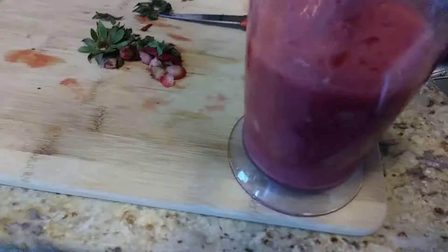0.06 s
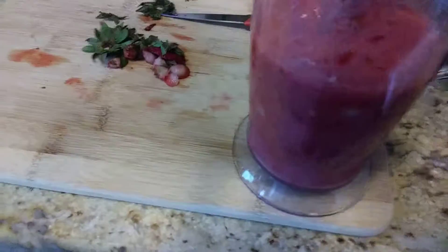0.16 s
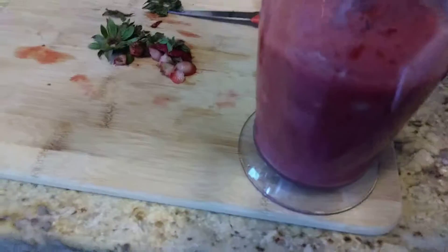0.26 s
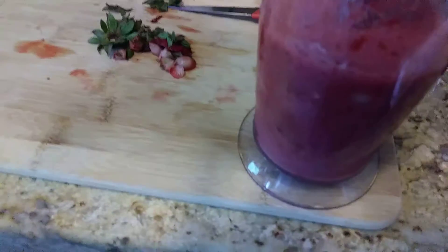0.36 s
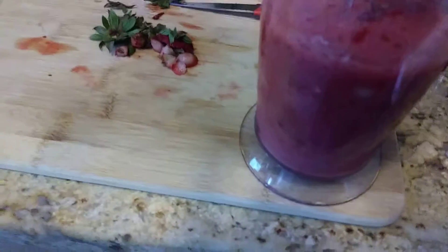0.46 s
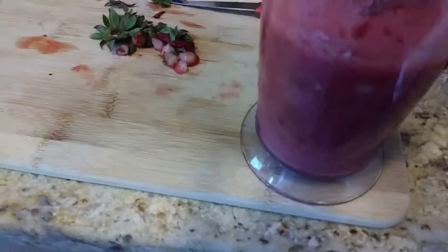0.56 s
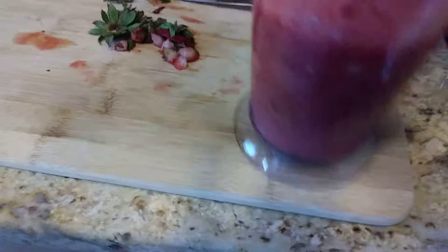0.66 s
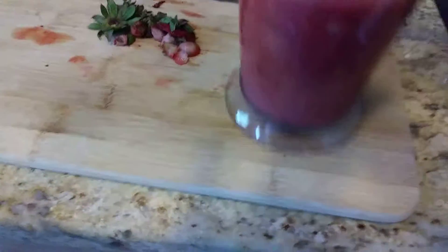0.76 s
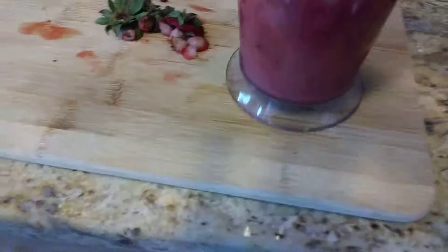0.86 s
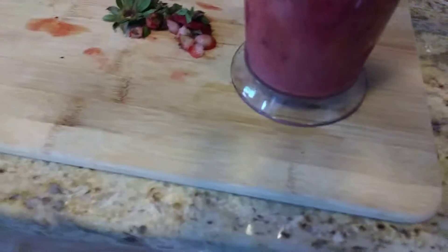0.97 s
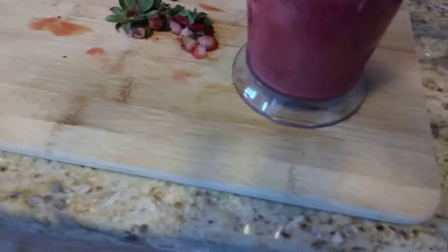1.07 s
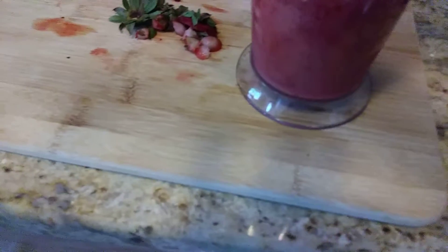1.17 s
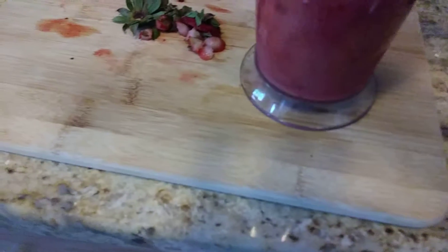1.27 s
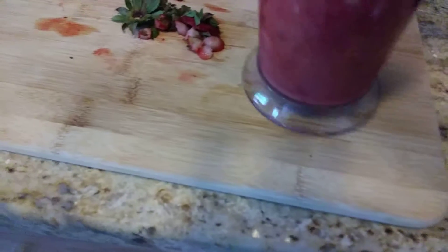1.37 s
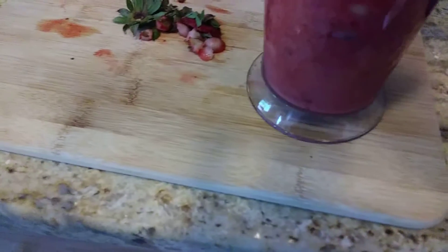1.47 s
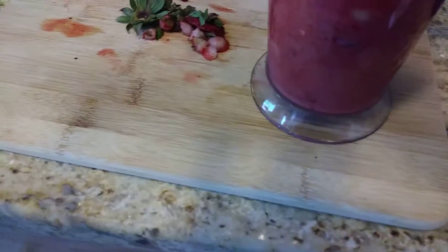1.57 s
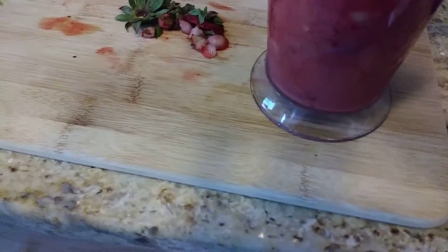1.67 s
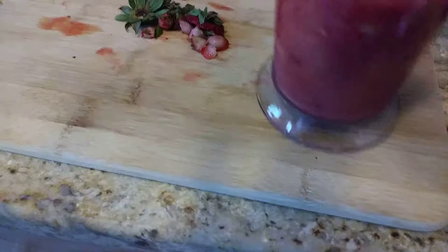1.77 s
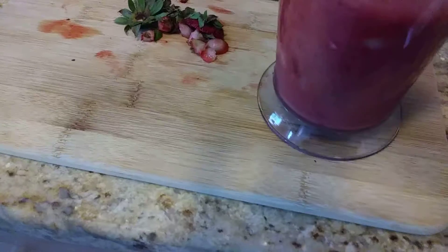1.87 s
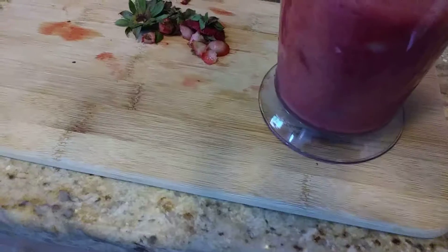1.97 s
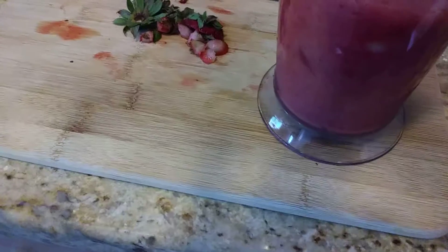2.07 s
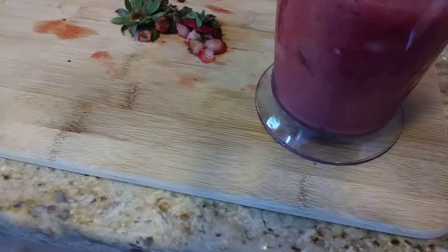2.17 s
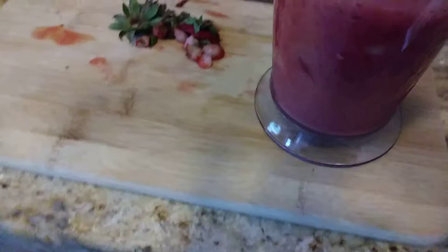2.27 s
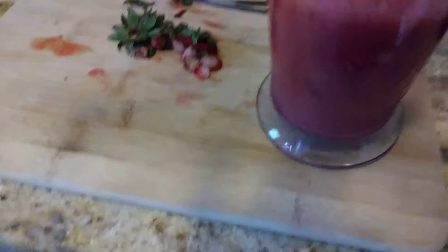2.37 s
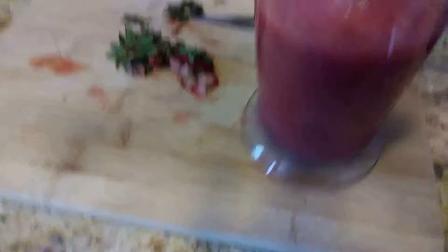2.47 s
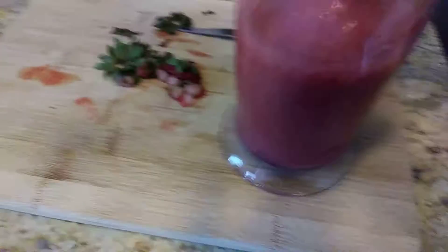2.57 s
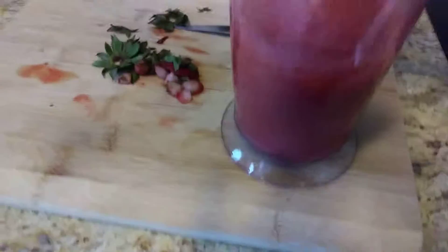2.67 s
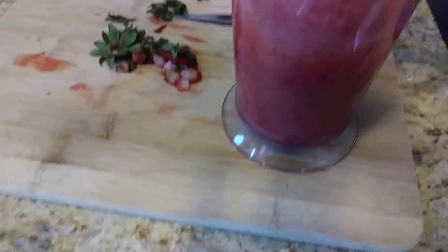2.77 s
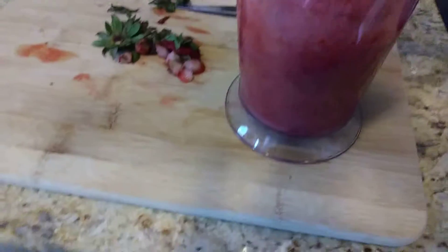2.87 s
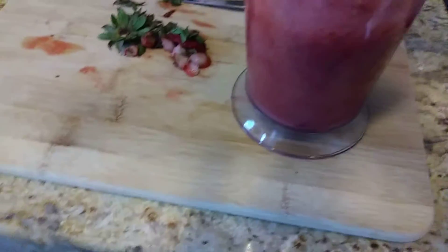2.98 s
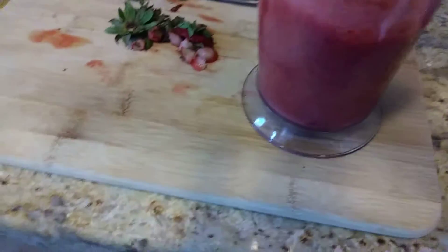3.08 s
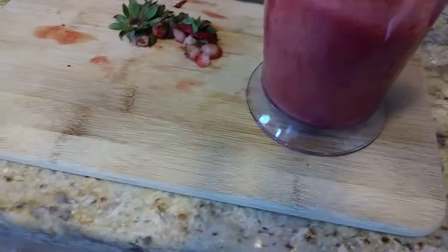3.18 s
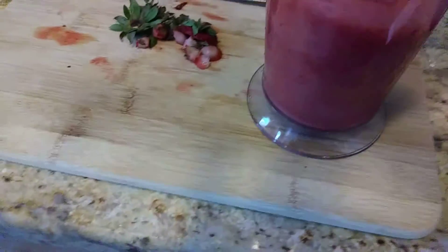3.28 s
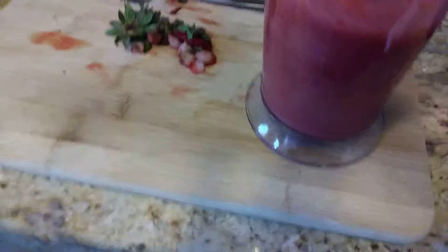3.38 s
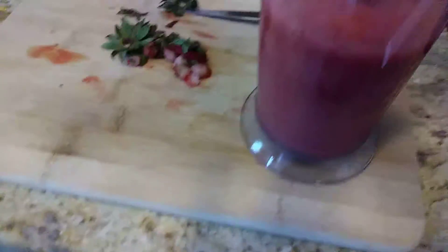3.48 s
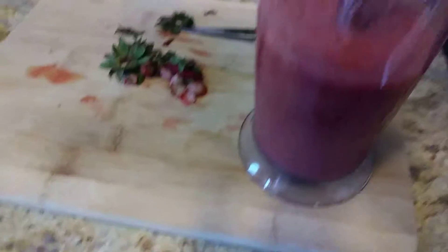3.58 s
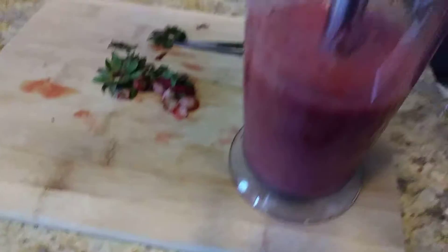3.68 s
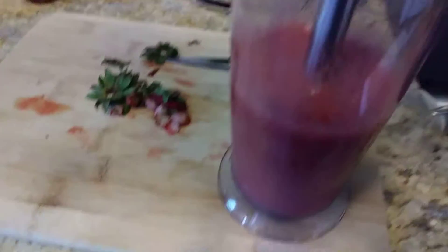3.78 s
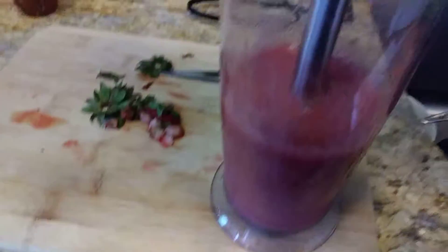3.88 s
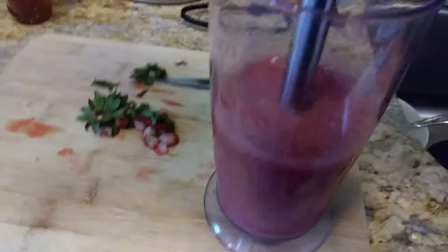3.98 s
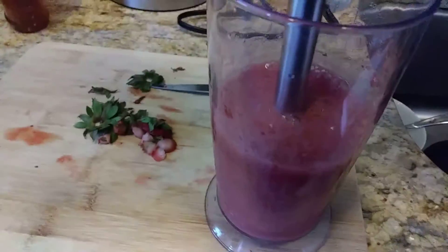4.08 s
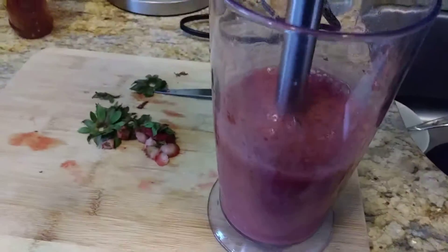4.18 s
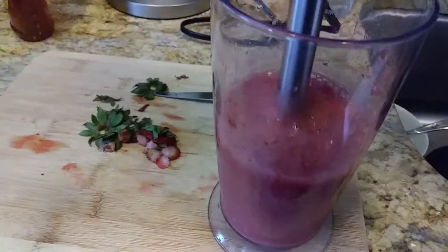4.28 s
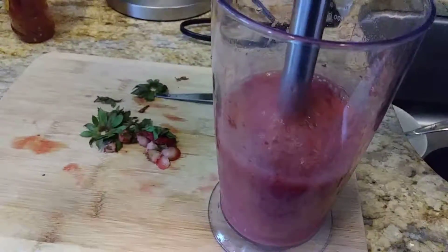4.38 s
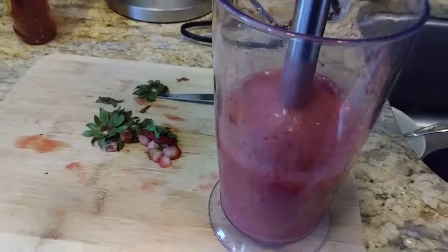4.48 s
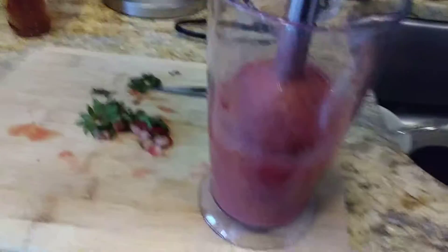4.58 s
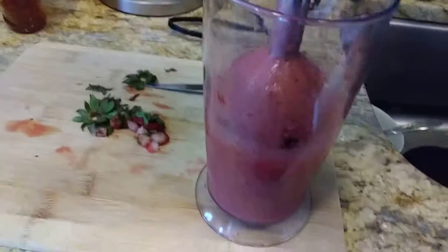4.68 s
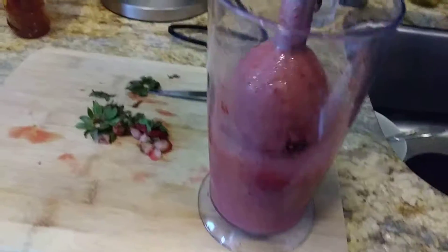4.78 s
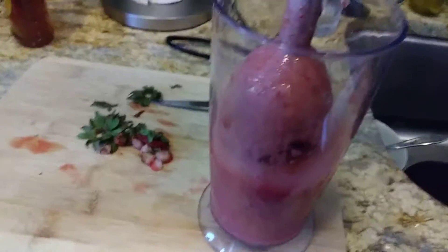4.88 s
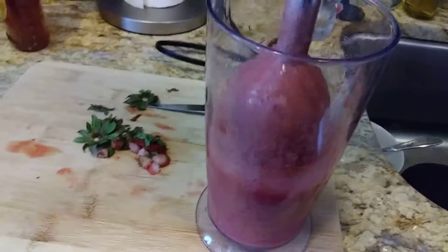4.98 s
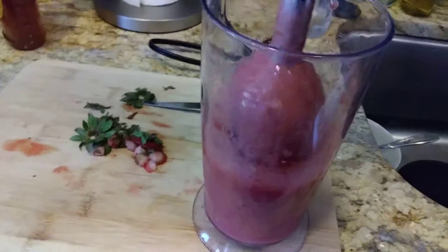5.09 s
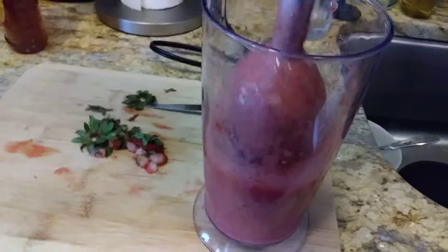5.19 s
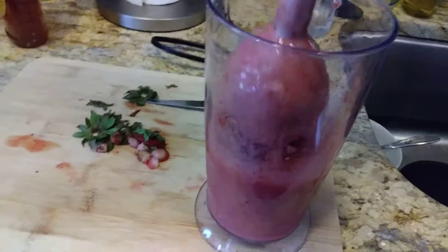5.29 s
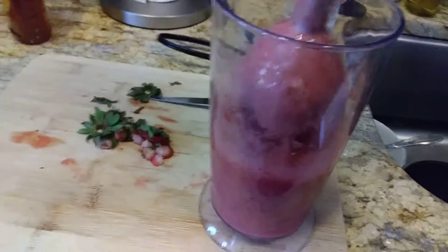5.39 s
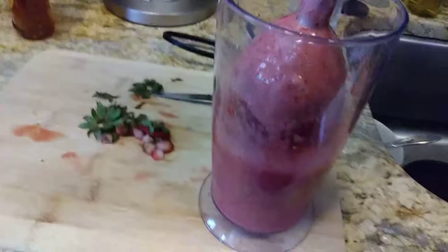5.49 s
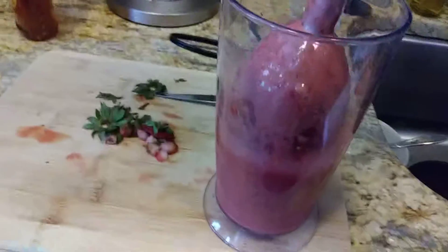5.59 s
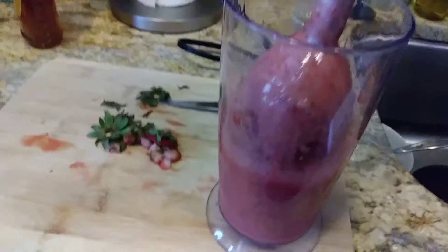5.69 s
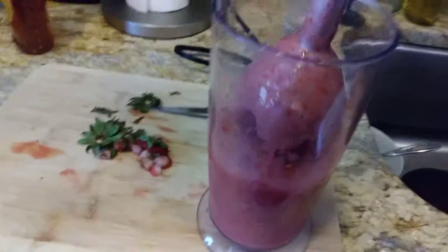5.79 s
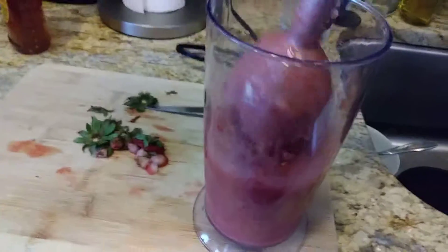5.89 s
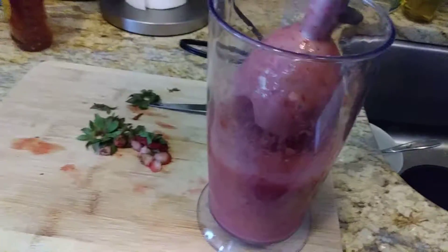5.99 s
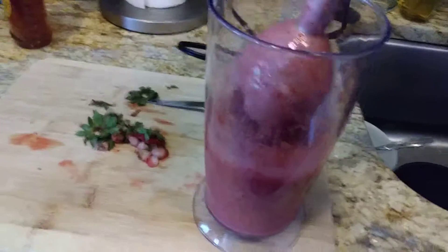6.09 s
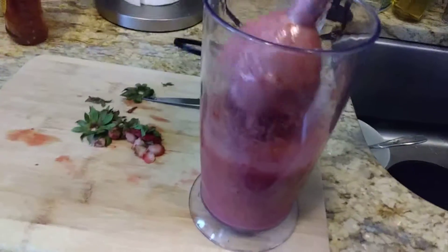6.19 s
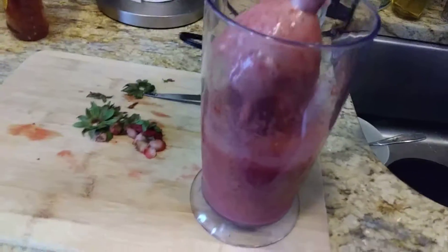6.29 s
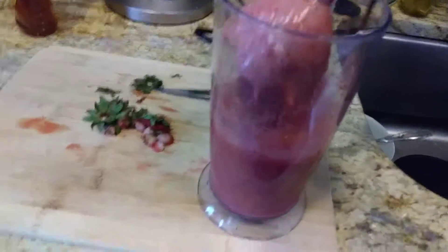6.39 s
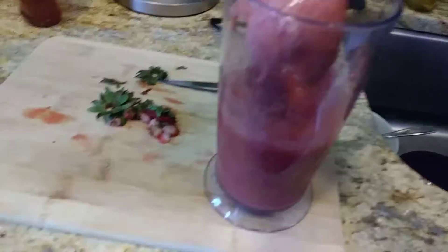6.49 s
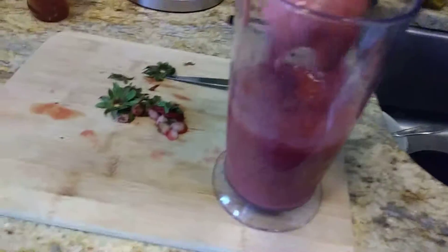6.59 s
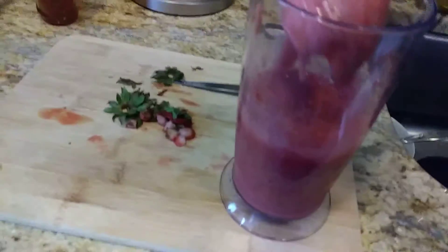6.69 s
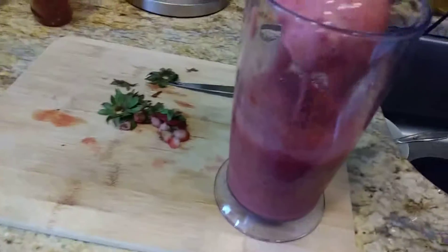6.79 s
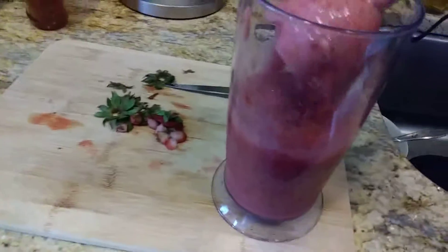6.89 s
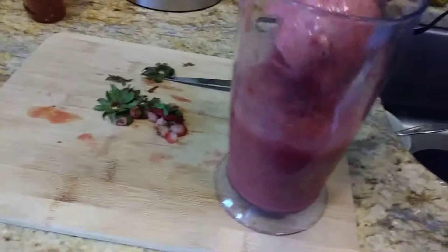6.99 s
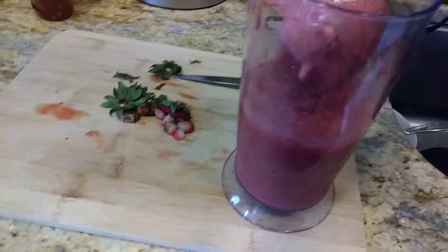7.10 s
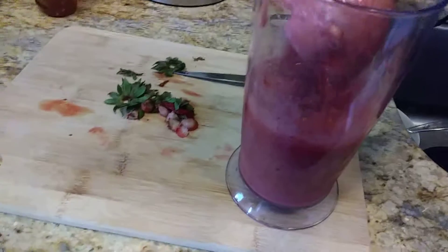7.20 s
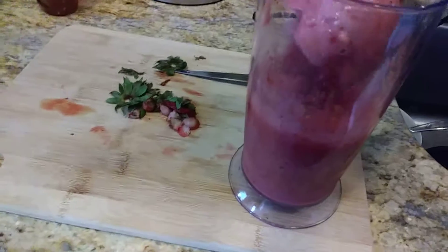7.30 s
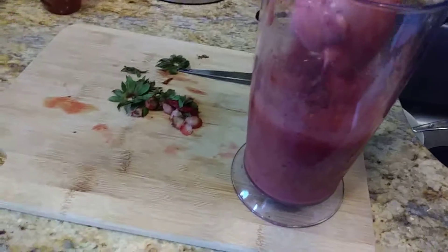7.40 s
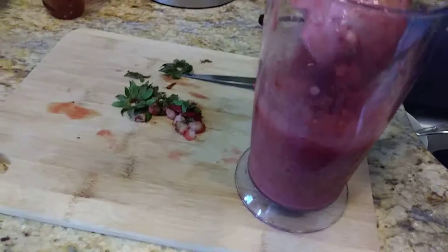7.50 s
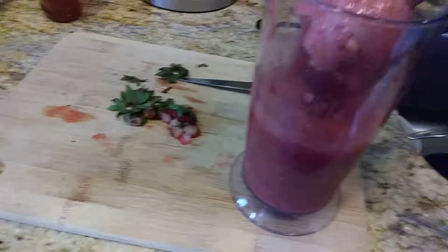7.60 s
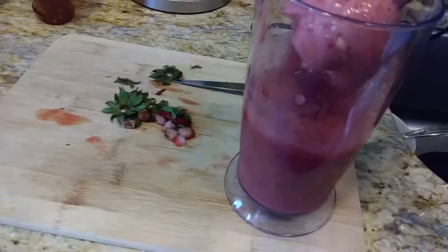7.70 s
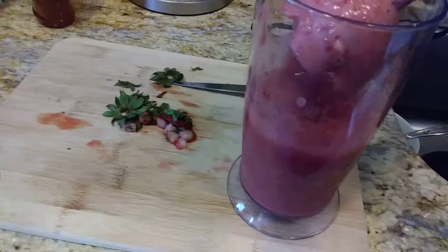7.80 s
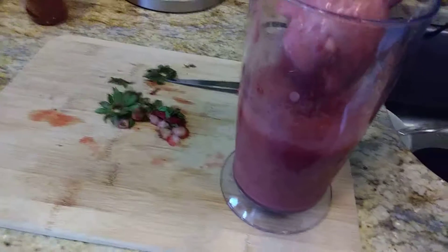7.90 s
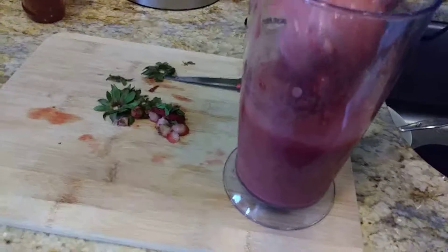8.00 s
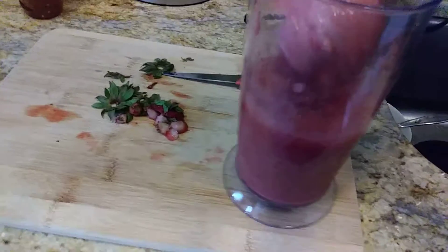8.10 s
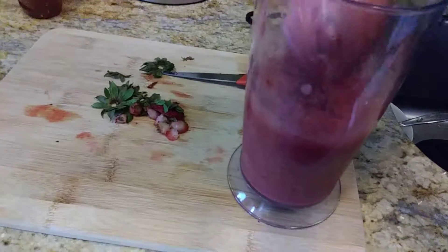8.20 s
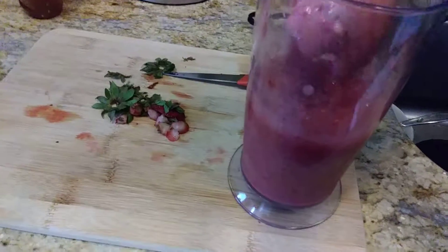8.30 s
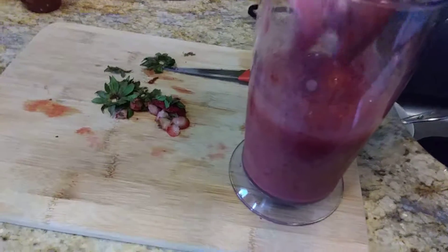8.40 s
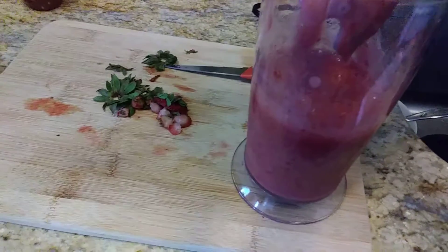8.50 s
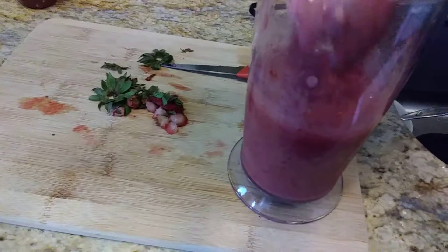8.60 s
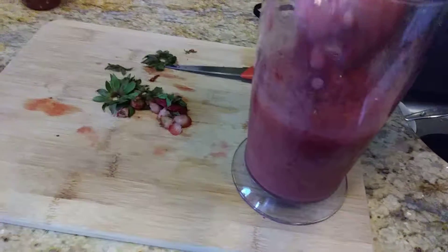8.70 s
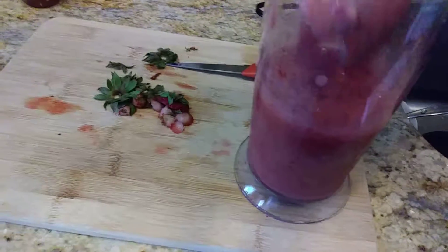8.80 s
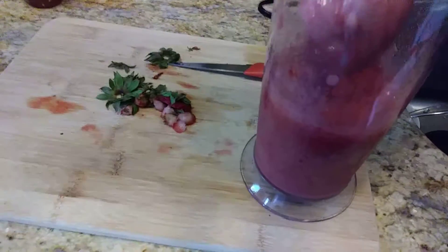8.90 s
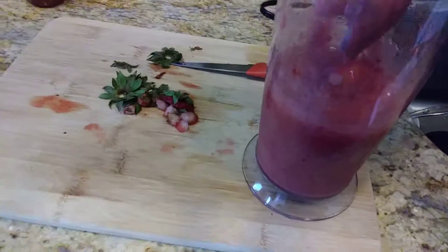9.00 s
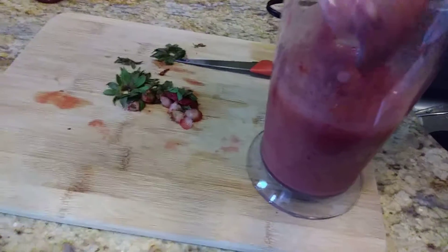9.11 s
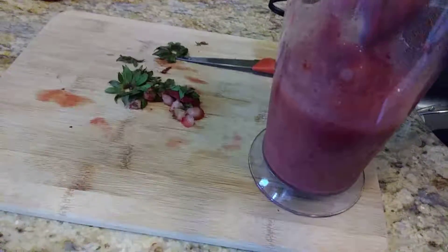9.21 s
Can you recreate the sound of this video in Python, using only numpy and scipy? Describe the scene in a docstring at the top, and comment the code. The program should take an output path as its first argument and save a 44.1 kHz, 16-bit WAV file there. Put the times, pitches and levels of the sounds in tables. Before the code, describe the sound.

A hand blender runs in four short bursts in thick fruit puree, whirring down after each, then plastic clicks and knocks on a board.

```python
"""Low steady room noise is heard first; then plastic clicks and a hand blender starts in a tall plastic beaker.
It runs four times in fruit puree and coasts down, with slurps and ticks as it slows: harmonics of the shaft
rotation hum, and noise struck once a turn rattles. In the middle bursts the blade bites deep and churns:
rushing noise, bubbles. Then the blender clicks against the beaker, whose damped modes ring as it knocks on
a wooden board. A decaying noise tail adds the reflections of a small kitchen."""
import sys
import numpy as np
from scipy import signal
from scipy.fft import rfft, irfft, next_fast_len
from scipy.io import wavfile
from scipy.ndimage import uniform_filter1d, minimum_filter1d

SR = 44100
rng = np.random.default_rng(int(sys.argv[2]) if len(sys.argv) > 2 else 0)


def unload_wav(signal):
    """Save mono or channel-first audio to the path in sys.argv[1] as 16-bit WAV at rate SR, clipped to [-1, 1]."""
    wavfile.write(
        sys.argv[1],
        SR,
        np.round(np.clip(np.atleast_2d(signal).T, -1, 1) * 32767).astype(np.int16),
    )


N = 407484


def amp(db):
    """Level to amplitude: 20 dB is a factor of ten."""
    return 10 ** (np.asarray(db) / 20)


def unit(x):
    """Normalisation to an rms value of 1."""
    return x / np.sqrt(np.mean(x ** 2) + 1e-20)


def read(points, hz):
    """Interpolation of a spectrum on a logarithmic frequency axis."""
    f, value = np.transpose(points)
    return np.interp(np.log(hz + 1), np.log(f + 1), value)


def add(mix, s, sound):
    """Superposition: a sound is summed into the mix from time s [s]."""
    part = mix[max(round(s * SR), 0):][:len(sound)]
    part += sound[:len(part)]


def colour(x, points, size=2048):
    """Minimum-phase filtering: a causal response with the given spectrum, keeping the power of white noise."""
    gain = unit(amp(read(points, abs(np.fft.fftfreq(size, 1 / SR)))))
    # the Hilbert transform of the log gain supplies the phase
    response = np.exp(np.conj(signal.hilbert(np.log(gain))))
    taps = np.fft.ifft(response).real
    return signal.oaconvolve(x, taps)[:len(x)]


def drift(n, hz):
    """Low-pass random modulation: a slow wander of rms 1, computed at every eighth sample."""
    size = next_fast_len(n // 8 + 2, True)
    f = np.fft.rfftfreq(size, 8 / SR)
    spectrum = rfft(rng.standard_normal(size)) / (1 + (f / hz) ** 2)
    slow = irfft(spectrum, size)
    return unit(np.interp(np.arange(n) / 8, np.arange(size), slow))


def resonate(x, hz, width):
    """Damped resonance by heterodyning: shift down by the moving frequency, low-pass, shift back."""
    turn = np.exp(2j * np.pi * np.cumsum(hz * np.ones(len(x))) / SR)
    r = np.exp(-np.pi * abs(width) / SR)
    return (turn * signal.lfilter([1 - r], [1, -r], x / turn)).real


# steady room noise: (frequency [Hz], relative level [dB per Hz])
FLOOR_SPECTRUM = [(15, -66.5), (25, -46), (45, -48), (68, -18), (87, -19.5), (212, -14), (344, -4),
                  (384, -12.5), (416, -17.5), (503, -16), (1260, -24.5), (1790, -31.5), (6380, -39.5),
                  (12200, -58), (16000, -57.5)]
FLOOR_DB = -44.5
MAINS_HZ, MAINS_DB = 59.5, -61


def background():
    """Stationary noise: filtered Gaussian noise with the sinusoidal hum of an appliance."""
    appliance = unit(np.sin(2 * np.pi * MAINS_HZ * np.arange(N) / SR))
    noise = unit(colour(rng.standard_normal(N), FLOOR_SPECTRUM, size=8192))
    return amp(FLOOR_DB) * noise + amp(MAINS_DB) * appliance


# reverberation of the kitchen: (frequency [Hz], t60 [s])
REVERBERATION = [(150, 1.42), (600, 0.36), (2000, 0.53), (6500, 0.3), (10000, 0.03), (16000, 2)]


def kitchen(x, gap_s=0.0085):
    """Diffuse reverberation: dense reflections after a gap, each band with its own exponential decay."""
    n = SR // 2
    taps = rng.standard_normal(n) * (np.arange(n) > gap_s * SR)
    hz, t, bands = signal.stft(taps, SR, nperseg=256)
    decay = amp(-60 * t / read(REVERBERATION, hz)[:, None])
    tail = signal.istft(bands * decay, SR)[1]
    return signal.fftconvolve(x, tail / np.linalg.norm(tail))[:N]


# spectrum of the click: (frequency [Hz], relative level [dB per Hz])
CLICK_SPECTRUM = [(300, -2), (700, -10), (1100, 2), (1450, -3.5), (1900, 0), (2350, -5.5), (3300, -1.5),
                  (4700, -2.5), (6000, 0), (7200, -2), (8300, -10), (10000, -13), (13000, -27),
                  (16000, -32)]
# soft rustle between the knocks: (time [s], length [s], level before its envelope [dB])
SOFT_RUSTLE = (8.52, .2, -48)


def rustle(s, length, db, rise_s=.02):
    """Amplitude-modulated noise: a brief soft rustle swells and dies away."""
    t = np.arange(round(length * SR)) / SR
    envelope = np.minimum(t / rise_s, 1) * (1 - t / length)
    return s, amp(db) * envelope * unit(colour(rng.standard_normal(len(t)), CLICK_SPECTRUM))


# plastic clicks and knocks, with slurps and ticks as the blender slows:
# (time [s], relative level of the click [dB], relative level of the knock [dB])
SHORT_SOUNDS = [(.354, -26.5, -36), (0.401, -19.5, -17), (1.383, -21, -43), (1.404, -29, -30),
                (1.753, -15, -31), (2.979, -12.5, -39), (3.017, -10.5, -31), (3.051, -15, -18),
                (3.074, -20, -35), (3.23, -36, -21), (3.254, -7, -9), (3.513, -5, -21), (4.321, -25, -41),
                (4.343, -26.5, -37), (4.76, -40, -33.5), (5.984, -7.5, -24.5), (7.02, -11.5, -25),
                (7.0591, -10, -14), (7.18, -12.5, -23.5), (7.3447, -22, -23), (7.354, -14, -17),
                (7.376, -34, -22.5), (7.4862, -9.5, -24.5), (7.521, -17.5, -21), (7.624, -13, -25),
                (7.776, -16, -29.5), (7.792, -21, -21.5), (7.977, -9, -16), (8.018, -37, -25),
                (8.174, -8, -13.5), (8.207, -32, -28), (8.281, -12.5, -26), (8.295, -19, -30.5),
                (8.812, -23, -37), (8.885, -8, -13.5), (9.005, -19.5, -25), (9.185, -27.5, -24)]
# modes of the beaker on the board: (nominal frequency [Hz], relative level [dB], t60 [s])
BEAKER_MODES = [(154.4, -21, 0.03), (253, -11.5, 0.1), (321, -3, 0.053), (402, -6, 0.11), (466, -3, 0.044),
                (637, 5, 0.034), (712, -5.5, 0.039), (900, -20.5, 0.041), (1260, -12.5, 0.0272),
                (1755, -17.5, 0.051)]
# thud of the board: (frequency [Hz], relative level [dB per Hz])
BOARD_SPECTRUM = [(40, -15), (80, -4.5), (170, 3.5), (330, -1), (560, 3.5), (800, -0.5), (1100, -14),
                  (3000, -43.5)]


def hit(s, click_db, knock_db, snap_s=0.0041, chatter_s=0.031, chatter_db=-16, snap_db=-6.0,
        body_db=3, lag_s=.002, thud_db=-9, thud_s=0.024):
    """Impulsive excitation: a short noise click, then damped beaker modes and the board's noise thud."""
    t = np.arange(SR // 5) / SR
    envelope = np.exp(-t / snap_s) + amp(chatter_db) * np.exp(-t / chatter_s)
    click = colour(rng.standard_normal(len(t)) * envelope, CLICK_SPECTRUM)
    age = np.maximum(t - lag_s, 0)
    body = np.zeros(len(t))
    for hz, db, t60 in BEAKER_MODES:
        # every call retunes the modes slightly and gives them a random sign
        mode_hz = hz * (1 + 0.032 * rng.standard_normal())
        body += rng.choice([-1, 1]) * amp(db - 60 * age / t60) * np.sin(2 * np.pi * mode_hz * age)
    body += amp(thud_db) * colour(rng.standard_normal(len(t)) * np.exp(-t / thud_s), BOARD_SPECTRUM)
    onset = 1 - np.exp(-age / 0.0025)
    return s, amp(click_db + snap_db) * click + amp(knock_db + body_db) * body * onset


# brief gliding rings, from air pockets and the rubbing shaft:
# (time [s], length [s], nominal first frequency [Hz], nominal last frequency [Hz], level before fades [dB])
GLIDING_RINGS = [(0.559, 0.049, 815, 1045, -19), (.865, .05, 848.1, 871, -19), (1.34, 0.15, 772, 635, -42),
                 (2.054, 0.075, 770, 690, -17.5), (2.29, 0.099, 2570, 3100, -21.5),
                 (2.321, 0.099, 1110, 1474, -12), (2.37, .19, 1510, 1175, -20),
                 (2.545, 0.38, 2240, 1930, -33), (2.765, 0.29, 1879, 2030, -24.5),
                 (2.81, 0.04, 864, 818, -12), (3.007, 0.082, 2115, 2295, -28), (3.275, 0.21, 730, 825, -10),
                 (3.478, 0.0654, 2500, 2740, -18), (3.62, 0.66, 822, 822, -23.5),
                 (3.824, .3, 4467, 4500, -26.5), (3.904, .16, 2630, 2740, -23),
                 (5.006, .32, 1960, 1860, -29), (5.273, 0.12, 1485, 1480, -27),
                 (5.135, 0.28, 4000, 4100, -21), (5.289, .42, 4640, 4940, -29.5),
                 (5.305, 0.97, 2640, 2605, -35.5), (6.381, 0.29, 1935, 1954, -42.5),
                 (6.668, 0.085, 1750, 2010, -45), (6.675, 0.064, 3350, 3450, -54),
                 (6.465, 0.295, 5500, 5050, -47.5), (8.997, .04, 1850, 1800, -37.5),
                 (9.092, .02, 1880, 1880, -51.5)]


def gurgle(s, length, first_hz, last_hz, db, damping=0.092, wobble=0.011):
    """Moving resonance: noise rings a cavity or the shaft at a gliding, unsteady pitch."""
    n = int(length * SR)
    hz = np.linspace(first_hz, last_hz, n) * (1 + wobble * drift(n, hz=25))
    width = damping * first_hz
    ring = resonate(resonate(rng.standard_normal(n), hz, width), hz, width)
    return s, amp(db) * unit(ring) * signal.windows.tukey(n, .6)


SPIN_UP_S = .042  # time constant
FRICTION_HZ, STALL_HZ = 35.8, 20  # dry friction brings the coasting shaft to rest


def throttle(t, on, off, coast_s, full_hz):
    """Rotational dynamics: exponential spin-up, then a coast against drag and dry friction, as share of full speed."""
    friction = FRICTION_HZ / full_hz
    coast = (1 + friction) * np.exp(-np.maximum(t - off, 0) / coast_s) - friction
    spin_up = 1 - np.exp(-(t - on) / SPIN_UP_S)
    return np.maximum(spin_up * coast, 1e-3)


def slaps(turns, hiss, play=0.024, decay_s=0.00081):
    """Periodic impact noise: the loose shaft strikes its bearing once a turn, over a hiss of rubbing."""
    n, hiss = len(turns), np.clip(hiss, 0, 1)
    speed = np.gradient(turns) * SR
    loose = turns + play * drift(n, hz=140) + 1
    # each turn draws its own strength
    strengths = amp(2.8 * np.clip(rng.standard_normal(n), -2, 1.5))
    size = strengths[loose.astype(int)]
    # each blow dies equally fast, so the blows come apart as the shaft slows
    since_s = (loose % 1) / (speed + 1)
    blows = unit(size * np.exp(-since_s / decay_s))
    return np.sqrt((1 - hiss) * blows ** 2 + hiss) * rng.standard_normal(n)


def tone(turns, order, waver_db):
    """Order of rotation: a sinusoid at a multiple of shaft speed, wavering with the shifting load."""
    wave = np.sin(2 * np.pi * (order * turns + rng.random()))
    return unit(wave * amp(waver_db * drift(len(turns), hz=21.2)))


HUM_LAW, DRONE_LAW = 3.47, 3.7  # amplitude grows as this power of the share of full speed


def hum(turns, share, hum_db, second_db, third_db):
    """Low-order rotation harmonics: the three lowest orders fade fast as the shaft slows."""
    first = amp(hum_db) * tone(turns, order=1, waver_db=0.36)
    drone = amp(second_db) * tone(turns, order=2, waver_db=3.0)
    drone += amp(third_db) * tone(turns, order=3, waver_db=2.5)
    return share ** HUM_LAW * first + share ** DRONE_LAW * drone


# upper shaft orders, one list a burst: (multiple of shaft speed [1], relative level [dB])
UPPER_ORDERS = [
    [(4, -11.5), (5, -3.5), (6, -11), (7, -16.5), (8, -9.5), (9, -5), (10, -13), (11, -35.5)],
    [(4, 1), (5, -2), (6, -1.5), (7, -2), (8, -4), (9, -2), (10, 1), (11, -9)],
    [(4, 2), (5, -5.5), (6, -5), (9, -26)],
    [(2.5, -12), (4, -3.5), (5, -4), (6, -0.5), (7, -2.5), (8, -2), (9, 1.5), (10, -6), (11, 2), (12, -6),
     (14, 0), (15, 1.5), (16, 0.5), (17, -1.5), (19, 0.5), (20, 4), (21, 0.5), (22, -1.5)],
]
# gear whir: (frequency [Hz], relative level [dB per Hz])
WHIR_SPECTRUM = [(150, -45.5), (700, -25.5), (1400, -11.5), (2050, 1.5), (2600, -0.5), (3100, -4),
                 (4300, -5.5), (5200, -6.5), (7000, -43.5)]
BUZZ_LAW, WHIR_LAW = 1.95, 1.424  # powers of the share of full speed; the buzz follows both


def gears(turns, share, orders, orders_db, whir_hiss=0.79, shake_turns=0.0062):
    """Phase-modulated harmonics: play in the coupling smears whole and half orders beside the gears' whir."""
    shaky = turns + shake_turns * drift(len(turns), hz=90)
    buzz = unit(sum(amp(db) * tone(shaky, round(2 * k) / 2, waver_db=3.5) for k, db in orders))
    whir = colour(slaps(turns, whir_hiss), WHIR_SPECTRUM)
    return share ** WHIR_LAW * (amp(orders_db) * share ** BUZZ_LAW * buzz + whir)


# ringing of the steel shaft and guard, damped as they sink deeper, one list a burst:
# (centre frequency [Hz], width of the narrow resonance [Hz], relative level [dB])
STEEL_MODES = [
    [(5980, 280, -11), (6630, 600, -1), (8940, 280, -3), (14450, 800, -17)],
    [(6700, 220, -9), (7440, 67, -8), (8840, 530, -4), (14420, 900, -20)],
    [(6740, 82, -4.5), (8850, 300, -5), (10100, 390, -21)],
    [(6466, 7.5, -0.5), (6646, 140, 2.5), (7350, 160, -5.5), (8920, 190, 0.5), (11073, 140, -7),
     (14370, 400, -16.5)],
]


def rings(x, modes, skirt_hz=1200, swell_db=2.26, swell_hz=5.8, wander_widths=0.27):
    """Modal resonance: two cascaded stages steepen the skirts; each mode swells and wanders a little."""
    sound, n = 0, len(x)
    for hz, width, db in modes:
        narrow = resonate(x, hz + wander_widths * width * drift(n, hz=swell_hz), width)
        ring = resonate(narrow, hz, skirt_hz)
        sound = sound + amp(db) * unit(ring * amp(swell_db * drift(n, hz=swell_hz)))
    return sound


# brushes when coasting: (frequency [Hz], relative level [dB per Hz])
BRUSH_SPECTRUM = [(2500, -34.5), (4400, -9.5), (5050, 4), (5500, 9.5), (6600, 5.5), (8000, -5.5),
                  (9100, -12), (10000, -8.5), (11600, -19.5), (12200, -3.5), (12800, -33.5), (16000, -30.5)]
# modes of the housing: (centre frequency [Hz], width of the narrow resonance [Hz], relative level [dB])
HOUSING_MODES = [(635, 58, 0.5), (1983, 170, 2), (5010, 120, 2), (12250, 150, -16.5)]


def brushes(turns, ringing, housing_db, hiss=0.36, linger_db=-15, uneven_db=3.8):
    """Friction excitation: brushes scrape unevenly and ring the housing; a little steel ringing lingers."""
    scrape = slaps(turns, hiss) * amp(uneven_db * drift(len(turns), hz=25))
    housing = amp(housing_db) * rings(scrape, HOUSING_MODES)
    return unit(colour(scrape, BRUSH_SPECTRUM) + housing + amp(linger_db) * ringing)


# shaft rattle under power: (frequency [Hz], relative level [dB per Hz])
RATTLE_SPECTRUM = [(200, -49), (1200, -24), (2500, -20), (4500, -4), (5500, 1.5), (6000, 2.5), (7400, 0),
                   (7900, -5.5), (8500, 3), (9100, -8.5), (9900, -20), (11000, -21), (12200, -14),
                   (13200, -23), (14400, -16.5), (16000, -36)]


def shaft_rattle(blows, ringing):
    """Source and resonator: broadband bearing blows sound together with the steel they ring."""
    return unit(colour(blows, RATTLE_SPECTRUM) + ringing)


# moments when the blade catches air: (time [s], half length to 1/e [s], peak gain [dB])
AIR_CATCHES = [(1.934, 0.063, -19), (2.193, 0.0295, -35)]
# bright spitting: (frequency [Hz], relative level [dB per Hz])
SPRAY_SPECTRUM = [(5000, -7.5), (9500, -1), (11500, -3), (13500, -15), (15200, -2), (16500, -21)]


def spits(t, blows):
    """Gaussian-gated noise: the blade catches air and its blows spit brightly."""
    gain = sum(amp(db) * np.exp(-((t - at) / half) ** 2) for at, half, db in AIR_CATCHES)
    return gain * colour(blows, SPRAY_SPECTRUM)


# churned puree, one list a burst: (frequency [Hz], relative level [dB per Hz])
PUREE_SPECTRA = [
    [(30, -27.5), (110, -18), (170, -8), (300, 0), (600, 2), (850, 3), (1200, -2), (1700, -11), (3000, -30)],
    [(30, -30), (110, -4.5), (170, 0), (300, 6), (550, 10), (850, 11.5), (1300, 4.5), (1700, -4),
     (3000, -35)],
    [(30, -20), (110, -23.5), (200, -12), (380, -5.5), (600, -1.5), (800, 2.5), (1050, -4), (1600, -10),
     (3000, -51)],
    [(30, -45), (110, -32), (200, -8), (400, 3), (640, 9.5), (850, -9.5), (1200, 6.5), (1700, 2),
     (3000, -27)],
]


def puree(n, spectrum, lumpy_db=1.0, bubbles_per_s=420, bubble_share=0.39, cycles=7, count=28):
    """Bubble acoustics: torn liquid gives a lumpy rush and a swarm of short, damped, rising tones."""
    rush, swarm = rng.standard_normal(n) * amp(lumpy_db * drift(n, hz=40)), np.zeros(n)
    t = np.arange(SR // 16) / SR
    for hz in np.geomspace(300, 2600, count):
        age = hz * t / cycles
        bubble = np.sin(2 * np.pi * hz * t * (1 + 0.037 * age)) * np.exp(-age)
        births = (rng.random(n) < bubbles_per_s / count / SR) * rng.uniform(0.79, 1, n)
        swarm += hz * signal.oaconvolve(births, bubble)[:n]
    share = np.clip(bubble_share, 0, 1)  # of the power
    rush, swarm = unit(colour(rush, spectrum)), unit(colour(swarm, spectrum))
    return np.sqrt(1 - share) * rush + np.sqrt(share) * swarm


# presses of the switch: (on [s], off [s], coasting time constant [s],
# speed below which the churning dies [Hz], speed below which the rattle stops [Hz],
# width of that change [Hz], change of the slack gears' whir [dB])
SWITCH_PRESSES = [(0.37, 1.01, 0.52, 91, 186.6, 7.5, -8), (1.715, 2.848, 0.27, 101.9, 152.5, 36, 0),
                  (3.188, 3.936, 0.27, 140.4, 150, 48, -4.5), (4.953, 5.766, 0.55, 90, 194, 30, 0)]
# load under power, one curve a burst: (time [s], nominal full shaft speed [Hz], order 1 level [dB],
# relative drone of orders 2 and 3 [dB], relative churning [dB], relative shaft rattle [dB])
LOAD_CURVES = [
    [(.46, 243.7, -20, -33, -29.5, -20), (.55, 242.8, -11.5, -30, -30.5, -18.5),
     (.62, 249.7, -21, -26, -31, -18), (.71, 247.7, -15.5, -18, -43, -13),
     (.82, 245.8, -20, -18, -36.5, -13.5), (.87, 243.4, -22, -17.5, -30, -11.5),
     (1, 243.6, -19.5, -23, -36.5, -12.5)],
    [(1.83, 242.1, -17.5, -28, -18, -23.5), (1.92, 236.9, -15, -36, -19, -17),
     (1.99, 231.4, -14.5, -22.5, -20.5, -14.5), (2.11, 218.3, -17, -24, -11, -16.5),
     (2.21, 225.6, -21, -28, -12, -14.5), (2.38, 223.9, -16.5, -18, -13.5, -16.5),
     (2.5, 219.6, -21.5, -27, -10, -13), (2.61, 225, -18, -24, -11.5, -21.5),
     (2.82, 209, -22, -34.5, -14, -17.5)],
    [(3.31, 208, -25, -6, -12.5, -28), (3.4, 205.5, -22, -8.5, -9, -24),
     (3.455, 209.6, -18.5, -0.5, -11.5, -23.5), (3.495, 210.2, -21, -8, -8, -15),
     (3.6, 213.4, -23, -15, -11.5, -21), (3.69, 213.3, -15.5, -16.5, -11, -12.5),
     (3.84, 215.9, -17.5, -10.5, -10, -15), (3.93, 218, -21.5, -14.5, -13, -20)],
    [(5.04, 250.2, -20.5, -35, -28.5, -10.5), (5.11, 250, -19, -38.5, -34, -13),
     (5.19, 247.7, -22.5, -33, -35, -9), (5.42, 244.8, -20.5, -39, -40, -12),
     (5.53, 246, -20.5, -39, -43, -8), (5.76, 243.9, -19.5, -43, -37.5, -12)],
]
# how the blade sits in each burst: (relative order 2 [dB], relative order 3 [dB], relative upper orders [dB],
# relative puree [dB], relative gear whir [dB], brushes before slowing [dB], relative housing ring [dB],
# share of shapeless hiss in the rattle's power [0-1])
BLADE_SEATING = [(-6.5, 0.5, 0, 8, -20.5, -31, -4.5, 0.42), (1, -6, -1.5, -2.5, -20.5, -20, -7, 0.61),
                 (-2.5, -20, -0.5, -0.5, -18, -22.5, -8, 0.4), (2.5, 1.5, 4, 4, -23.5, -18.5, -0.5, 0.5)]
FADE_IN_S, ENGAGE_S = 0.056, .066  # fade of the burst; delay of the rattle after the switch
BRUSH_LAW, CHURN_LAW = 1.38, 2.2  # powers of speed; below its dying speed the churning falls as this power
WHIR_FOLLOW = 0.33  # dB of gear whir per dB of rattle


def blender(press, load, seating, orders, steel, churn_spectrum, rattle_db=-1.5, rattle_law=1.0):
    """Rotating-machine noise: through spin-up, run and coast-down, shaft speed governs the layers of a burst."""
    on, off, coast_s, churn_hz, slack_hz, slack_width_hz, slack_whir_db = press
    second_db, third_db, orders_db, puree_db, whir_db, brush_db, housing_db, hiss = seating
    s, *columns = np.transpose(load)
    last_hz = columns[0][-1]
    stop = off + coast_s * np.log((last_hz + FRICTION_HZ) / (STALL_HZ + FRICTION_HZ))
    t = np.arange(round(on * SR), round(stop * SR)) / SR
    full_hz, hum_db, drone_db, churn_db, shaft_db = (np.interp(t, s, c) for c in columns)
    share = throttle(t, on, off, coast_s, full_hz)
    speed = share * full_hz
    turns = np.cumsum(speed * (1 + .002 * drift(len(t), hz=28.68))) / SR

    sound = hum(turns, share, hum_db, drone_db + second_db, drone_db + third_db)
    churn_gain = amp(churn_db + puree_db) / np.hypot(1, (churn_hz / speed) ** CHURN_LAW)
    sound += churn_gain * puree(len(t), churn_spectrum)

    # as the shaft slows its rattle gives way to the scrape of the brushes, and the gears go slack
    driven = .5 + .5 * np.tanh((speed - slack_hz) / slack_width_hz)
    follow_db = WHIR_FOLLOW * (shaft_db - shaft_db.mean())
    gear_gain = amp(whir_db + follow_db + slack_whir_db * (1 - driven))
    sound += gear_gain * gears(turns, share, orders, orders_db)

    blows = slaps(turns, hiss)
    ringing = rings(blows, steel)
    engaged = np.clip((t - on - ENGAGE_S) / .006, 0, 1)
    rattle_gain = amp(shaft_db + rattle_db) * engaged * share ** rattle_law * np.sqrt(driven)
    sound += rattle_gain * shaft_rattle(blows, ringing)
    brush_gain = amp(brush_db) * share ** BRUSH_LAW * np.sqrt(1 - driven)
    sound += brush_gain * brushes(turns, ringing, housing_db)
    sound += spits(t, blows)
    fade_in = np.minimum((t - on) / FADE_IN_S, 1) ** 2
    return on, sound * fade_in * signal.windows.tukey(len(t), .03)


def scene(motor_room_db=-17, hits_room_db=-11):
    """Direct and reverberant field: blender, gurgles and short sounds in the kitchen, over its background."""
    motor, hits = np.zeros(N), np.zeros(N)
    for burst in zip(SWITCH_PRESSES, LOAD_CURVES, BLADE_SEATING, UPPER_ORDERS, STEEL_MODES, PUREE_SPECTRA):
        add(motor, *blender(*burst))
    for row in GLIDING_RINGS:
        add(motor, *gurgle(*row))
    for row in SHORT_SOUNDS:
        add(hits, *hit(*row))
    add(hits, *rustle(*SOFT_RUSTLE))
    room = kitchen(amp(motor_room_db) * motor + amp(hits_room_db) * hits)
    return (motor + hits + room + background())[None]


EDGE_HZ = 16100  # upper band limit


def record(dry, ceiling=0.88):
    """Peak limiting and band limiting: a fast smoothed gain holds peaks down, then a low-pass filter."""
    allowed = ceiling / np.maximum(abs(dry), ceiling)
    gain = uniform_filter1d(minimum_filter1d(allowed, size=111), size=111)
    lowpass = signal.firwin(401, EDGE_HZ, window=("kaiser", 9), fs=SR)
    return signal.oaconvolve(dry * gain, lowpass[None], "same")


dry = scene()
out = record(dry)
unload_wav(out)
```